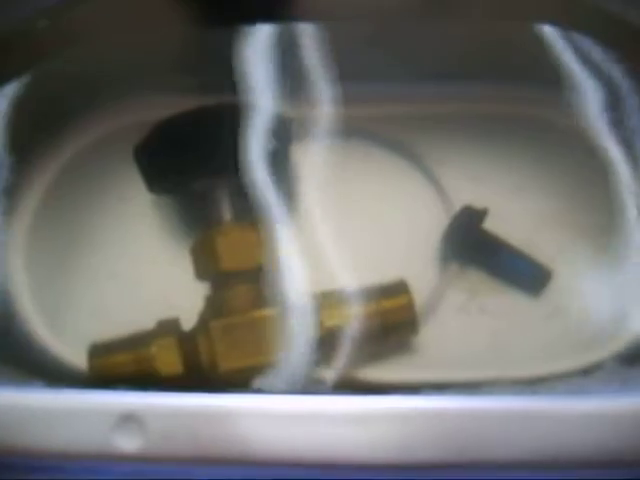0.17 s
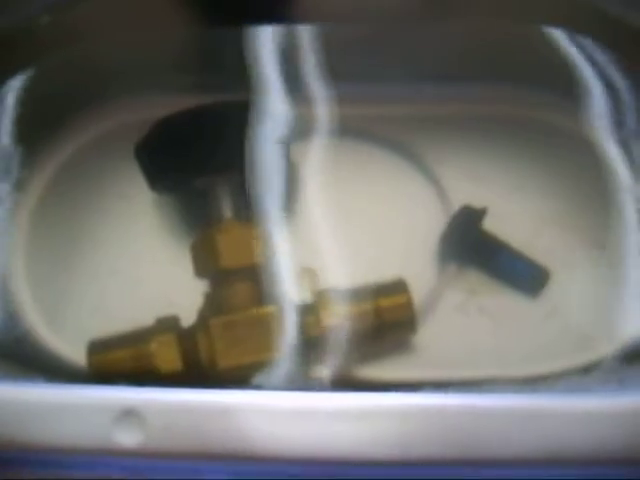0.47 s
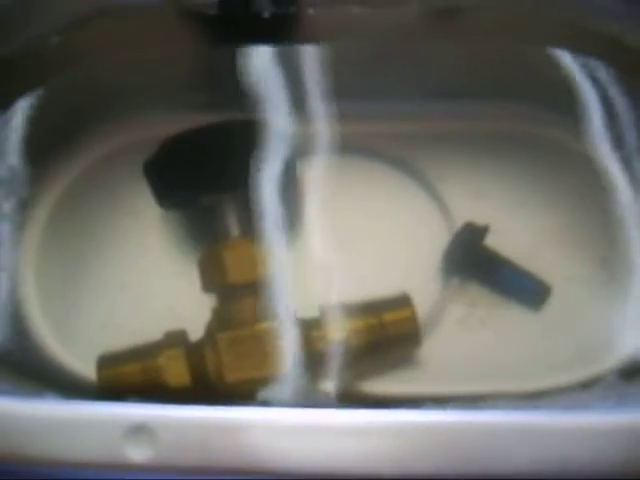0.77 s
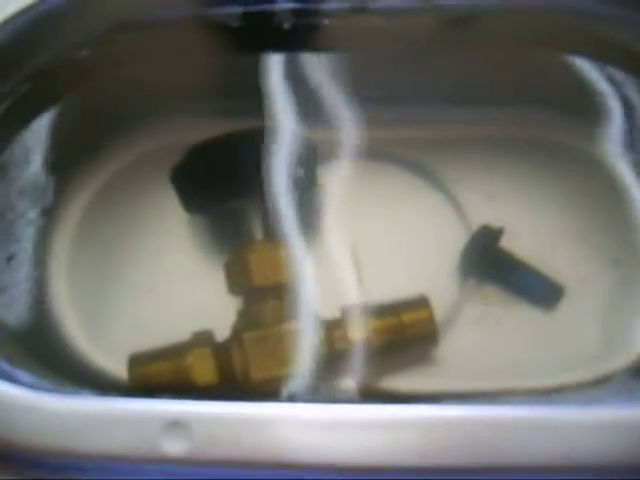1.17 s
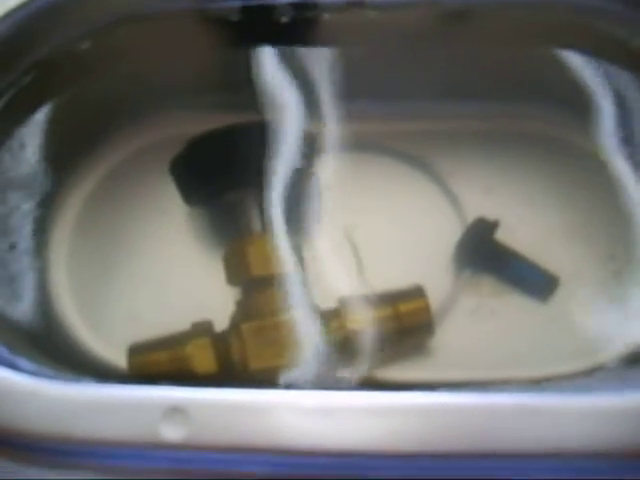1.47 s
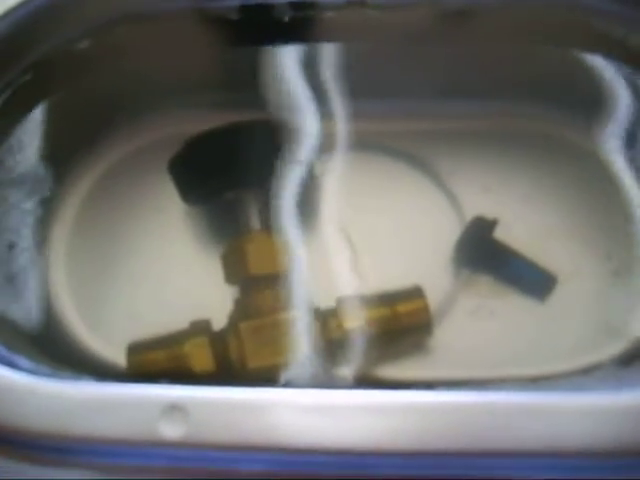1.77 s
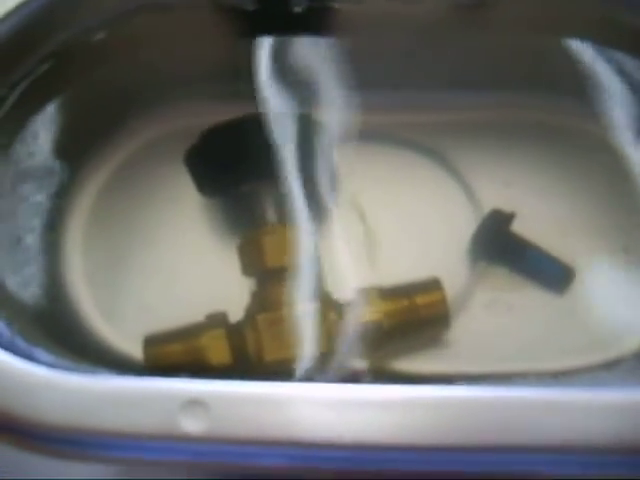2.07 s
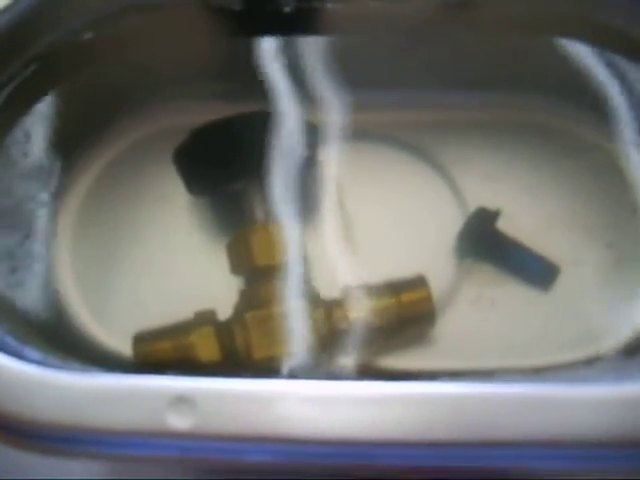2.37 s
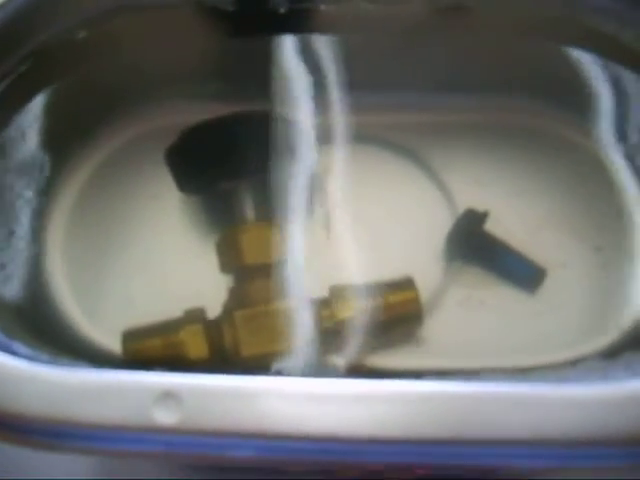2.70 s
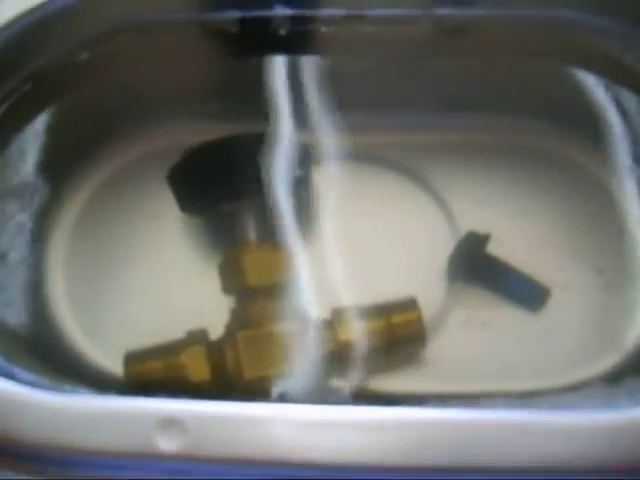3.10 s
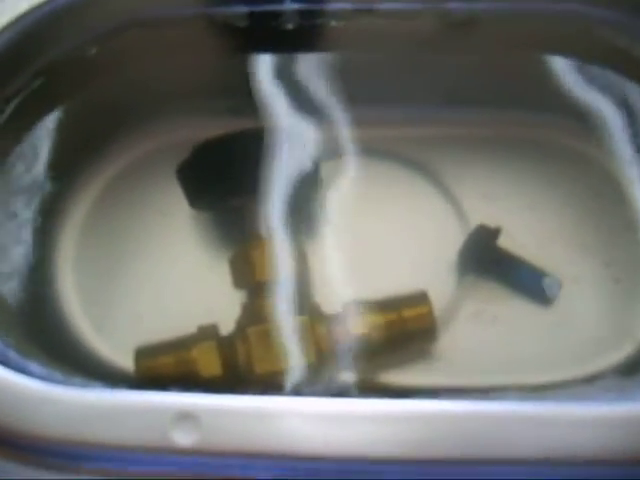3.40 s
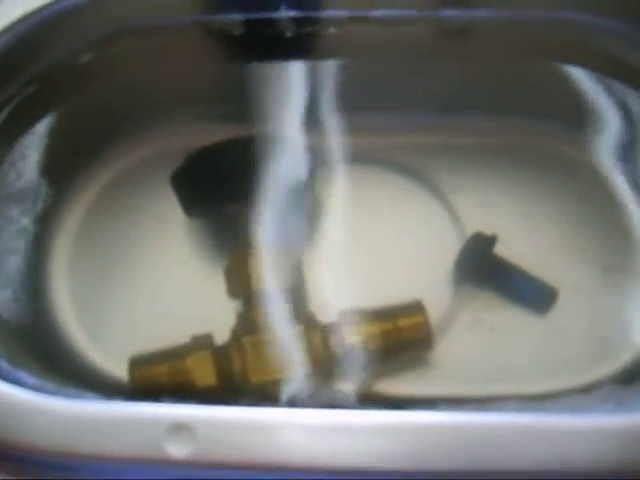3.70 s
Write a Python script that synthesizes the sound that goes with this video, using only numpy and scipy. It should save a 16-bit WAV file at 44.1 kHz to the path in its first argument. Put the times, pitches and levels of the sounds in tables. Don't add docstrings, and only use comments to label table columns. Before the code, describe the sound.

An ultrasonic cleaning bath with brass parts in water runs without pause indoors, close to the microphone: a piercing, rapidly pulsing hiss, metallic buzz and very faint low hum, with a sharp knock near the end.

```python
import sys
import numpy as np
from scipy import signal
from scipy.fft import rfft, irfft, next_fast_len
from scipy.io import wavfile
from scipy.ndimage import uniform_filter1d

SR = 44100
rng = np.random.default_rng(int(sys.argv[2]) if len(sys.argv) > 2 else 0)


def wav_record(signal):
    frames = np.transpose(np.atleast_2d(signal))
    bounded = np.clip(frames, -1, 1)
    quanta = np.round(bounded * 32767).astype(np.int16)
    wavfile.write(sys.argv[1], SR, quanta)


def gain_from_db(level_db):
    decades = np.asarray(level_db, float) / 20
    return 10 ** decades


N = 169785

PULSE_HZ, DRIFT_HZ_PER_S, SLOWEST_S = 119.968, .0029, 1.9
PULSE_START = 0.22
# start_s, level_db
SURGE = [(0.0, -42.5), (0.35, -42), (0.7, -41), (1.05, -40.5), (1.4, -38), (1.75, -39.5), (2.1, -38),
         (2.45, -46.5), (2.8, -39.5), (3.15, -39.5), (3.5, -46.5), (3.85, -40)]
# start_s, level_db
SHAKE = [
    (0, -39.5),
    (.5, -38),
    (1.3, -39.5),
    (2, -40),
    (2.55, -40.5),
    (3.0, -40),
    (3.85, -39.5),
]
# centre_hz, width_hz, density_db (per Hz)
WATER_MODES = [(6740, 460, -77.5), (6910, 280, -78), (7220, 190, -75), (7500, 160, -78.5), (7930, 160, -75),
               (8310, 260, -75), (8615, 187, -73.5), (9390, 200, -77.5), (9510, 210, -72), (9840, 146, -72),
               (9710, 180, -74), (10090, 180, -74), (10420, 160, -84), (12100, 160, -107)]


def turns():
    t = np.arange(N) / SR
    return PULSE_HZ * t + DRIFT_HZ_PER_S / 2 * (t - SLOWEST_S) ** 2


def control(curve):
    t, level_db = np.transpose(curve)
    return np.interp(np.arange(N) / SR, t, level_db - level_db.mean())


def wander(fast_hz, count=1):
    step = 32
    size = N // step + 2
    hz = np.fft.rfftfreq(size, step / SR)
    response = (hz > 0) / np.sqrt(1 + (hz / fast_hz) ** 4)
    v = irfft(rfft(rng.standard_normal((count, size))) * response, size)
    v = v / v.std(1, keepdims=True)
    return np.array([np.interp(np.arange(N) / step, np.arange(size), row) for row in v])


def read(points, at):
    a, value = np.transpose(points)
    return np.interp(np.log(at + 1), np.log(a + 1), value)


def ring(drive, modes, gaps):
    size = 8192
    hz = np.fft.rfftfreq(size, 1 / SR)
    power = gain_from_db(read(gaps, hz)) ** 2
    for f, w, db in modes:
        power = power + gain_from_db(db) ** 2 / (1 + 0.49 * (2 * (hz - f) / w) ** 2) ** 2
    cepstrum = irfft(np.log(power * SR / 2) / 2, size)
    cepstrum = cepstrum[:size // 2] * np.where(np.arange(size // 2) > 0, 2, 1)
    response = irfft(np.exp(rfft(cepstrum, size)), size)[:size // 2]
    return signal.oaconvolve(drive, response)[:N]


def bubbles(drive_db, off_db, strike, pulse_db, flutter_db, clump_db, start=PULSE_START, swell=0.13):
    at = turns() - start + 1
    u = at % 1
    rise = np.sin(np.pi / 2 * np.minimum(u / swell, 1)) ** 2
    hold = np.cos(np.pi / 2 * u ** 1.3)
    first_strike = strike * np.exp(-np.maximum(u - swell, 0) / 0.1)
    shape = rise * (hold + first_strike)
    gate = np.sqrt(gain_from_db(off_db) ** 2 + shape ** 2)
    own_db = pulse_db * rng.standard_normal(600)[at.astype(int)]
    flutter = wander(20)[0]
    flutter = flutter - uniform_filter1d(flutter, size=SR // 4)
    level = gate * gain_from_db(own_db + flutter_db * flutter + clump_db * wander(500)[0])
    level = level * gain_from_db(drive_db)
    return level / np.sqrt(np.mean(level ** 2)) * rng.standard_normal(N)


def flares():
    flare_events = [(0.04, 0.027, 1), (0.108, 0.014, 7), (0.148, 0.016, -4.8), (0.204, 0.014, -7),
                    (0.25, 0.011, -10), (0.432, 0.014, -6), (0.459, 0.023, 5.4), (0.484, 0.014, -4),
                    (0.536, 0.027, 6.5), (0.598, 0.02, -4.9), (0.68, 0.07, 3.5), (0.84, 0.02, 1),
                    (0.873, 0.014, -13), (0.892, 0.014, 3), (1.052, 0.045, 4.5), (1.102, 0.014, -10),
                    (1.128, 0.012, -6), (1.17, 0.087, 5.5), (1.212, 0.012, 4.8), (1.252, 0.03, -2),
                    (1.34, 0.014, 6), (1.374, 0.012, 3), (1.476, 0.1, 1.5), (1.484, 0.014, -8),
                    (1.495, 0.014, -7), (1.62, 0.014, -5), (1.725, 0.011, 8.5), (1.772, 0.02, -3.8),
                    (1.82, 0.014, -6), (1.864, 0.03, -8), (1.944, 0.034, 3.5), (1.997, 0.03, 2.6),
                    (2.02, 0.02, -3.9), (2.132, 0.02, -5), (2.176, 0.013, -9), (2.338, 0.014, -9),
                    (2.364, 0.014, -2), (2.416, 0.014, -5.1), (2.446, 0.017, 8), (2.53, 0.014, -7.7),
                    (2.576, 0.014, -3.7), (2.64, 0.015, -7), (2.68, 0.016, -5.1), (2.743, 0.04, 1),
                    (2.81, 0.014, 4), (2.848, 0.045, -5), (2.897, 0.014, -5), (2.928, 0.03, 3.4),
                    (2.972, 0.03, -5), (3.048, 0.02, 4), (3.243, 0.07, -7), (3.384, 0.064, -5.0),
                    (3.445, 0.014, 9), (3.512, 0.02, 3.7), (3.756, 0.03, -6), (3.834, 0.014, -6)]
    t = np.arange(N) / SR
    return sum(db * np.exp(-np.log(2) * (2 * (t - s) / length) ** 2) for s, length, db in flare_events)


def uneven():
    pulse = (turns() - PULSE_START + 1).astype(int)
    return rng.standard_normal(600)[pulse] + 0.7 * wander(600)[0]


def upper_water(flare, cloud):
    drive_db = 1.05 * control(SURGE) + 0.93 * flare + 0.73 * cloud
    noise = bubbles(drive_db, -17, 0.087, 0.3, 0.21, 0.2, start=0.14, swell=0.24)
    return ring(noise, WATER_MODES[7:12], [(100, -125), (20000, -125)])


def lower_water(flare, cloud):
    # freq_hz, density_db (per Hz)
    water_gaps = [(5500, -105), (6600, -83.5), (8000, -84.5), (9000, -85.5), (11000, -130)]
    drive_db = 1.03 * control(SHAKE) + 0.13 * flare + 0.51 * cloud
    noise = bubbles(drive_db, -8, .05, 0.4, 0.6, .2, start=0.099, swell=0.55)
    return ring(noise, WATER_MODES[:7], water_gaps)


def spray(flare, cloud):
    # freq_hz, density_db (per Hz)
    spray_spectrum = [(8000, -105), (9000, -78), (10300, -82), (10800, -89.5), (11700, -96.5), (12400, -95)]
    drive_db = 0.17 * (control(SURGE) + control(SHAKE)) + 0.23 * flare + 1.4 * cloud
    noise = bubbles(drive_db, -13, .15, .4, 0.4, 0.3, start=0.19, swell=0.16)
    return ring(noise, WATER_MODES[12:], spray_spectrum)


def tank_wall():
    wall_hz = [3420, 3520, 3700, 3800, 4050, 4174, 4570, 4965, 5287, 5400, 5706, 5943, 6083, 6300]
    # width_hz, density_db (per Hz)
    wall_modes = [(80, -87.5), (75, -80), (74, -80), (71, -76), (129, -83.5), (65, -78), (88, -79.5),
                  (152, -77.5), (58.7, -72), (80, -73.5), (109, -74), (90, -71.5), (90, -72.5),
                  (248, -80.5)]
    # freq_hz, density_db (per Hz)
    wall_gaps = [(2500, -120), (3200, -99), (3600, -83.5), (4000, -82.5), (4700, -86.5), (5500, -84),
                 (6500, -85.5), (9000, -130)]
    modes = [(hz, *row) for hz, row in zip(wall_hz, wall_modes)]
    return ring(bubbles(0.67 * control(SHAKE), 3.8, .1, 0.48, 0.3, 0.38), modes, wall_gaps)


def buzz(orders, follow, waver_db, waver_turns):
    answer_delays = [(0, .16), (8, .5), (16, .08), (29, .4), (33, .12), (37, .63), (42, .55), (46, .1)]
    # multiple, shaking (dB per dB), rocking (dB per dB), creep (dB per s)
    loose_partials = [(3, .05, 1, 0), (4, .05, -1.7, .3), (8, .3, -1, -1.3), (9, .05, -1.5, -.5),
                      (17, .05, 0, .8), (18, .05, 0, -.8), (30, .6, 0, -.4), (31, 2.3, 0, 0),
                      (35, .3, -1.2, -1.8), (42, 0, 0, .3), (45, 1.5, 0, 0), (48, 1, .8, -.8)]
    # start_s, level_db
    rocking = [(0, -2), (.4, -2.5), (.58, 2.5), (.9, 2.5), (1.05, 0), (1.5, 0), (1.6, -2), (1.78, 1.5),
               (2.2, 0), (2.32, -1.5), (2.45, .5), (3.3, .5), (3.5, 2.2), (3.65, 0), (3.85, 0)]
    k, db = np.transpose(orders)
    size, slip = wander(6.7, count=len(k)), wander(6.1, count=len(k))
    start, delay = np.transpose(answer_delays)
    part = np.searchsorted(start, np.arange(64), "right") - 1
    late = np.cumsum(delay[part])[k.astype(int)]
    phase = k[:, None] * turns() - late[:, None]
    phase = phase + .25 * rng.random((len(k), 1)) + waver_turns * slip
    loose = {row[0]: row[1:] for row in loose_partials}
    response = [loose.get(int(m), (follow, 0, 0)) for m in k]
    shake, rock, creep = np.transpose(response)[:, :, None]
    db = db[:, None] + shake * control(SHAKE) + rock * control(rocking)
    db = db + creep * (np.arange(N) - N / 2) / SR
    return np.sqrt(2) * (gain_from_db(db + waver_db * size) * np.sin(2 * np.pi * phase)).sum(0)


def high_buzz():
    high_partials = [(30, -54.8), (31, -61.1), (32, -68.4), (34, -63.6), (35, -61.0), (36, -63.8),
                     (38, -62.9), (39, -62.7), (40, -63.1), (41, -64.3), (42, -57.0), (43, -65.2),
                     (44, -62.0), (45, -59.8), (47, -63.4), (48, -53.9), (49, -52.8), (50, -57.4),
                     (51, -65.9), (52, -62.4), (53, -62.3), (54, -67.3), (55, -64.0)]
    return buzz(high_partials, follow=.3, waver_db=.7, waver_turns=.02)


def low_buzz():
    low_partials = [(2, -77.2), (3, -58.5), (4, -65.2), (6, -79.7), (7, -77.3), (8, -67.6), (9, -69.0),
                    (10, -80.5), (11, -72.8), (12, -74.1), (13, -72.1), (14, -71.4), (15, -76.5),
                    (16, -78.9), (17, -57.0), (18, -64.2), (19, -70.5), (20, -71.1), (21, -79.2),
                    (22, -80.7), (23, -73.9), (24, -71.2), (25, -82.5), (26, -80.4), (27, -80.6),
                    (28, -68.6)]
    return buzz(low_partials, follow=.05, waver_db=.7, waver_turns=.012)


def housing():
    # centre_hz, width_hz, density_db (per Hz)
    housing_modes = [(338, 55, -87.5), (500, 67, -94.5), (701, 56, -88), (960, 167, -87), (1160, 16, -99),
                     (1551, 110, -82.5), (1870, 19, -90.5), (2052, 62, -86), (2110, 96, -96),
                     (2326, 82, -91), (2540, 79, -89.5), (2745, 51, -91.5), (2851, 11.6, -82.5),
                     (3186, 13, -87)]
    # freq_hz, density_db (per Hz)
    room_spectrum = [(25, -108), (60, -101), (150, -88.5), (330, -86), (900, -93.5), (1300, -95.5),
                     (3000, -101), (9000, -130)]
    return ring(bubbles(0.081 * control(SHAKE), 2.2, 0.23, 0.13, 0.56, 0.3), housing_modes, room_spectrum)


def ticks():
    # start_s, level_db (the envelope peaks 11 dB lower), pitch_hz
    knocks = [
        (3.0388, -26.5, 1500),
        (1.42, -34, 800),
        (1.735, -34, 1000),
    ]
    out, t = np.zeros(N), np.arange(600) / SR
    for s, db, hz in knocks:
        envelope = gain_from_db(db) * t / .0006 * np.exp(-t / .00045)
        out[round(s * SR):][:len(t)] += envelope * np.sin(2 * np.pi * hz * t)
    return out


def fan():
    # pitch_hz, level_db (rms)
    hum_lines = [(54.5, -81.5), (76.7, -82), (96.9, -81), (118.4, -64.5), (145.3, -76.5), (199.2, -73.5),
                 (300.1, -75.5), (329.7, -94)]
    hz, db = np.transpose(hum_lines)
    phase = hz[:, None] * np.arange(N) / SR + rng.random((len(hz), 1)) + .015 * wander(3, count=len(hz))
    level_db = db[:, None] + .35 * wander(3, count=len(hz))
    return np.sqrt(2) * (gain_from_db(level_db) * np.sin(2 * np.pi * phase)).sum(0)


def scene():
    flare, cloud = flares(), uneven()
    hiss = upper_water(flare, cloud) + lower_water(flare, cloud) + spray(flare, cloud)
    body = tank_wall() + high_buzz() + low_buzz() + housing()
    return (hiss + body + ticks() + fan())[None]


def top_cut(x):
    return signal.sosfilt(signal.butter(12, 12470, fs=SR, output="sos"), x)


def record(dry):
    # freq_hz, gain_db
    mic_response = [(15, -15), (45, -4), (90, 0), (11990, 0), (12120, -12), (12260, -6), (12400, -17),
                    (12520, -30)]
    # centre_hz, width_hz, depth_db
    rim_dips = [(3645, 40, -7), (8090, 70, -4), (9060, 200, -3), (9925, 90, -7), (10330, 150, -2)]
    size = next_fast_len(N + 4096)
    hz = np.fft.rfftfreq(size, 1 / SR)
    colour_db = read(mic_response, hz)
    colour_db = colour_db + sum(db * np.exp(-(2 * (hz - f) / w) ** 2) for f, w, db in rim_dips)
    mix = irfft(rfft(dry, size) * gain_from_db(colour_db), size)[:, :N]
    return top_cut(mix)


dry = scene()
out = record(dry)
wav_record(out)
```